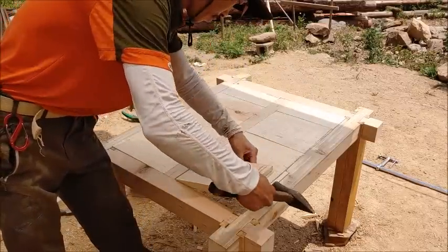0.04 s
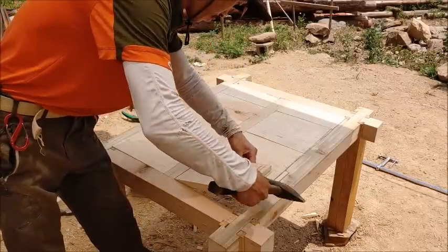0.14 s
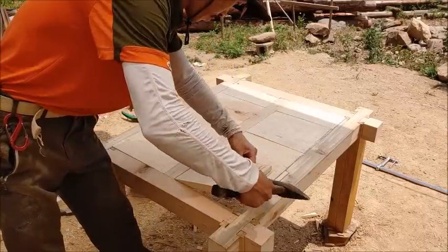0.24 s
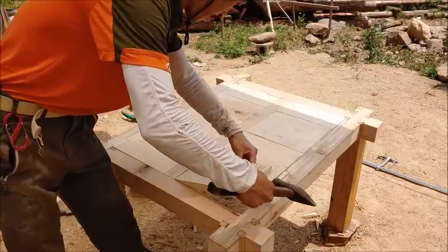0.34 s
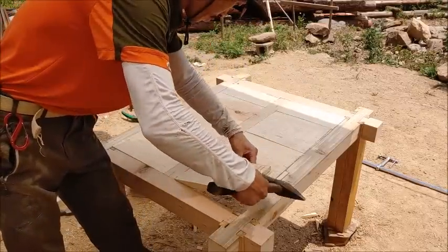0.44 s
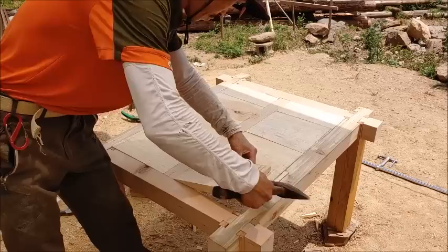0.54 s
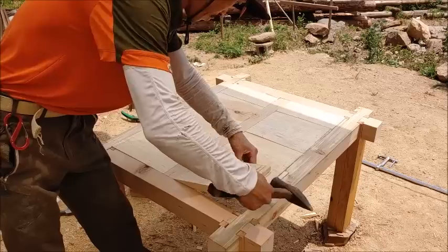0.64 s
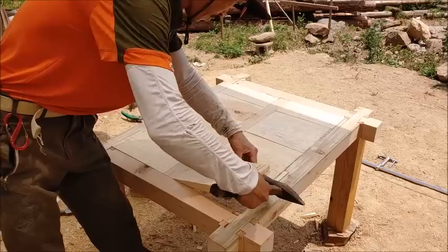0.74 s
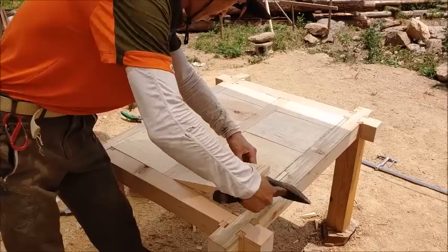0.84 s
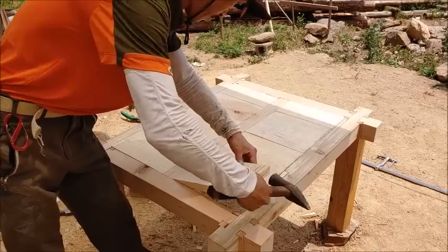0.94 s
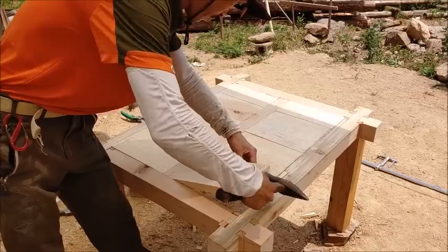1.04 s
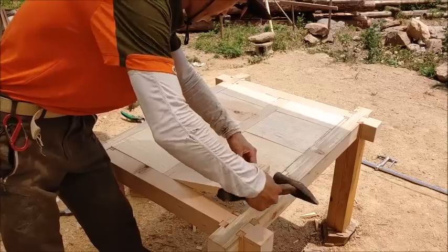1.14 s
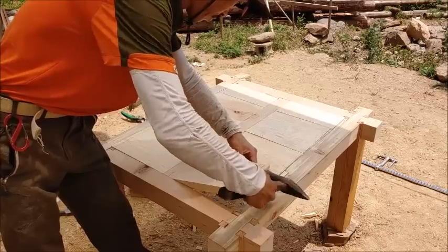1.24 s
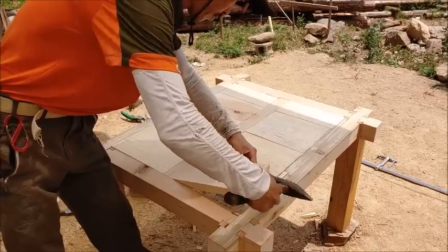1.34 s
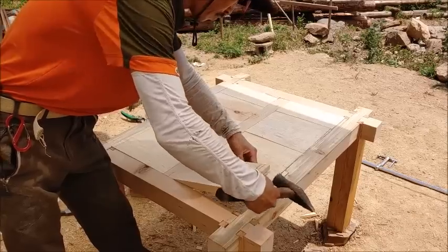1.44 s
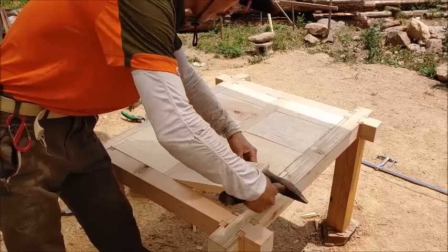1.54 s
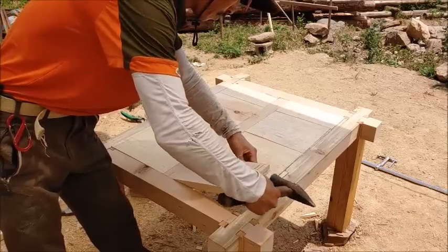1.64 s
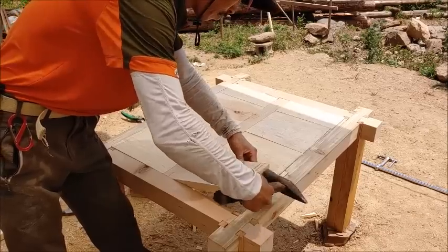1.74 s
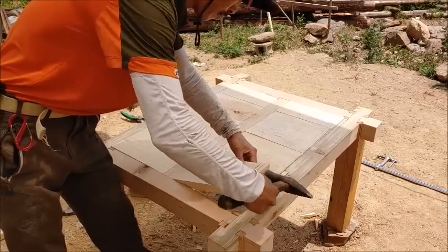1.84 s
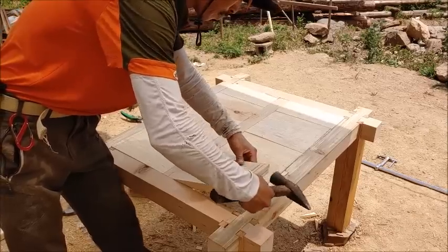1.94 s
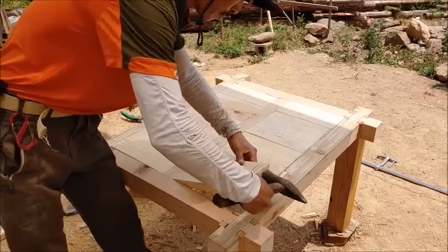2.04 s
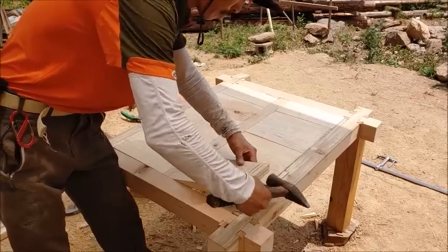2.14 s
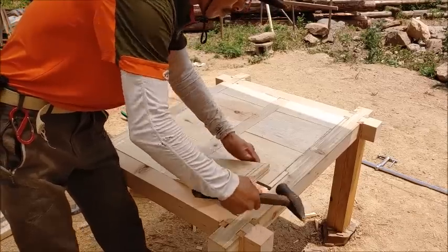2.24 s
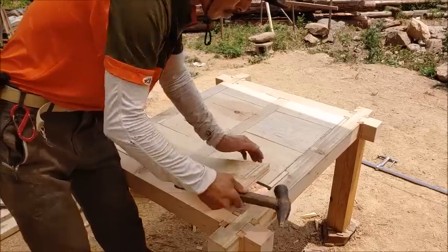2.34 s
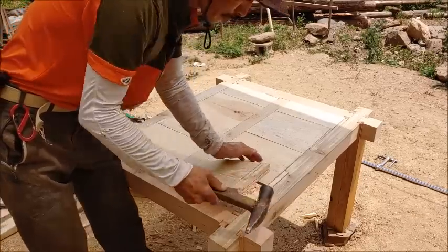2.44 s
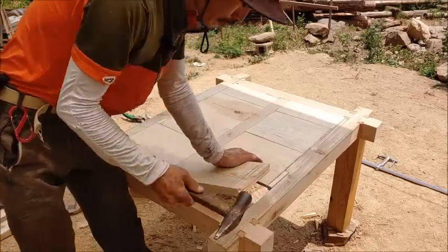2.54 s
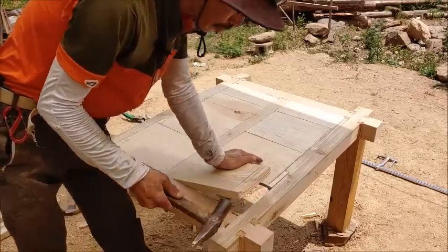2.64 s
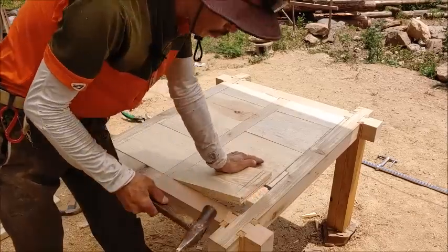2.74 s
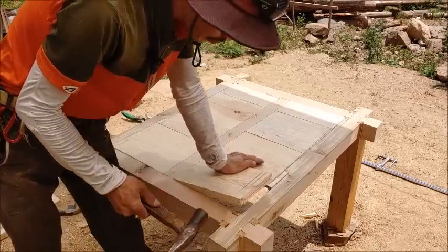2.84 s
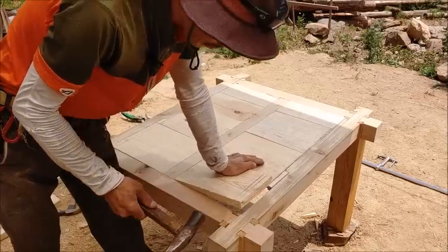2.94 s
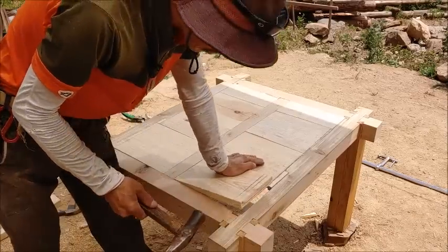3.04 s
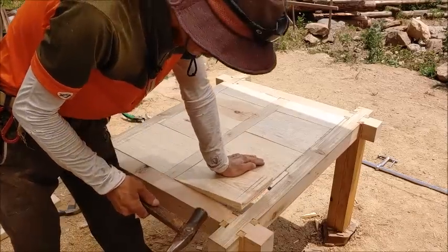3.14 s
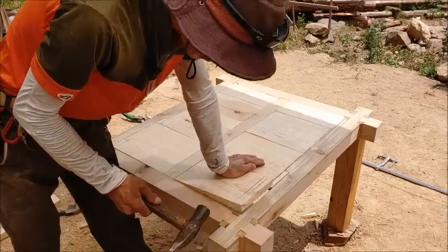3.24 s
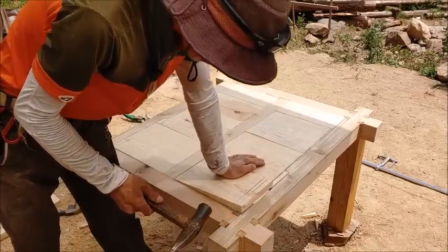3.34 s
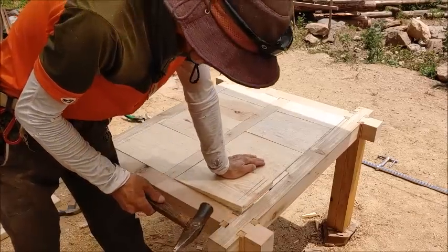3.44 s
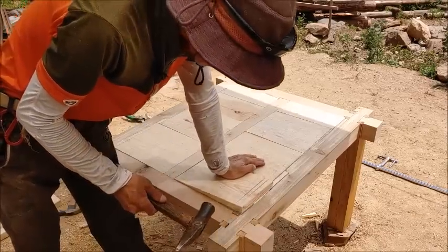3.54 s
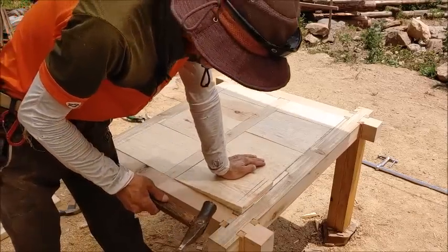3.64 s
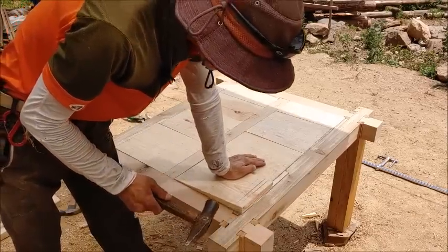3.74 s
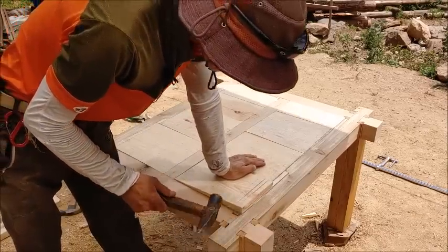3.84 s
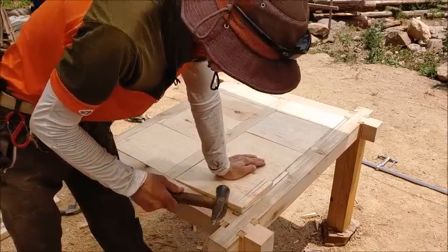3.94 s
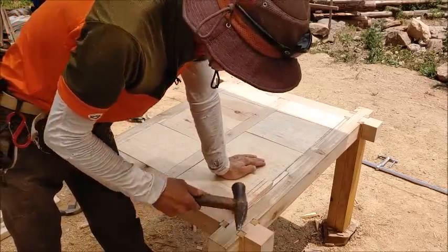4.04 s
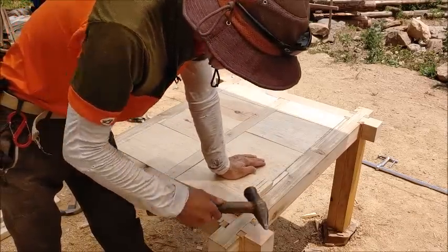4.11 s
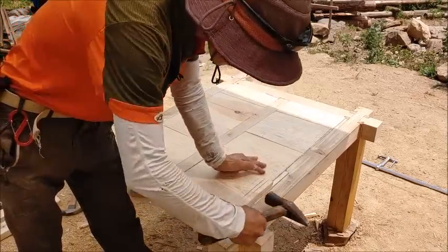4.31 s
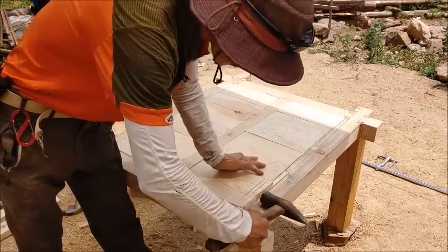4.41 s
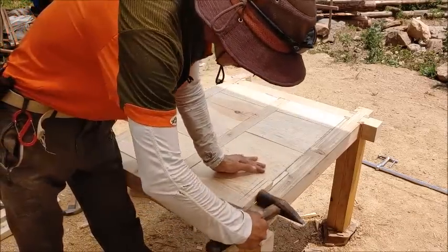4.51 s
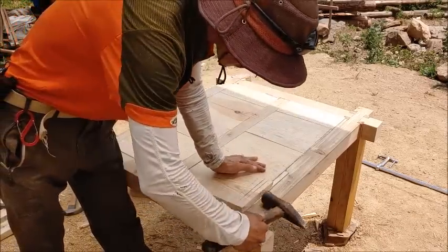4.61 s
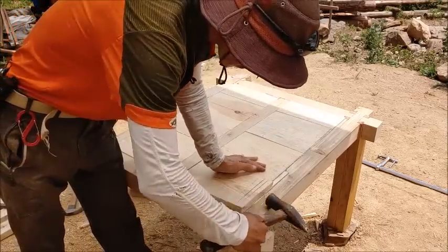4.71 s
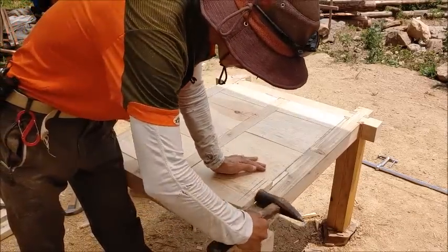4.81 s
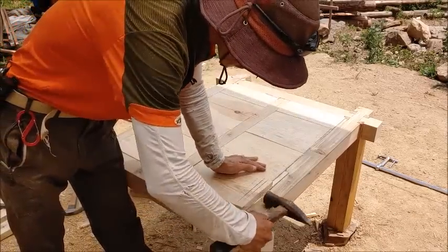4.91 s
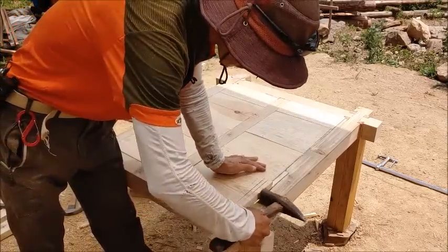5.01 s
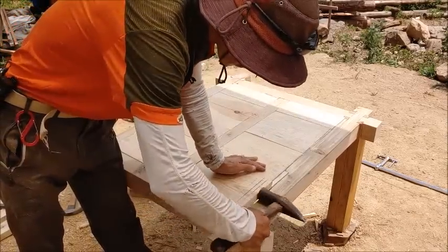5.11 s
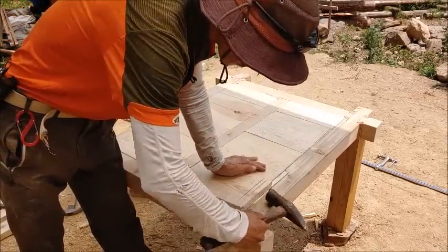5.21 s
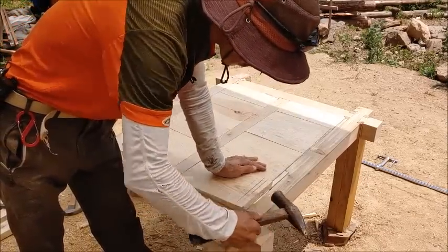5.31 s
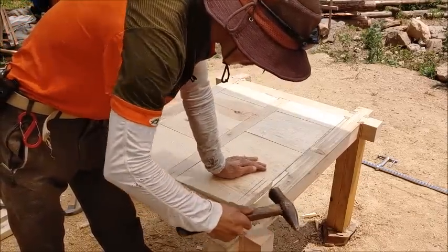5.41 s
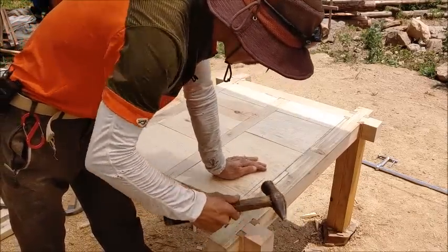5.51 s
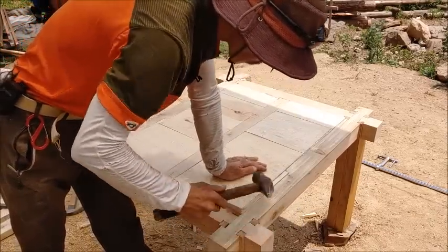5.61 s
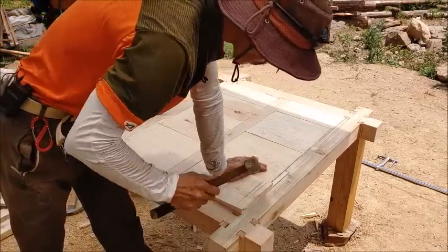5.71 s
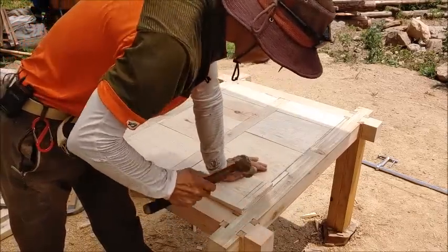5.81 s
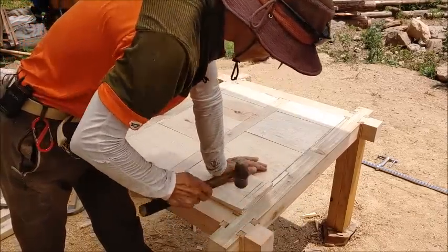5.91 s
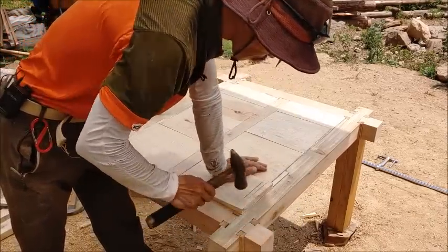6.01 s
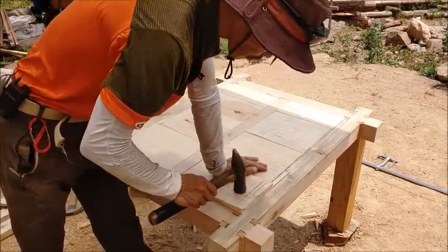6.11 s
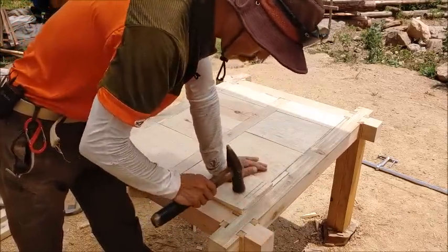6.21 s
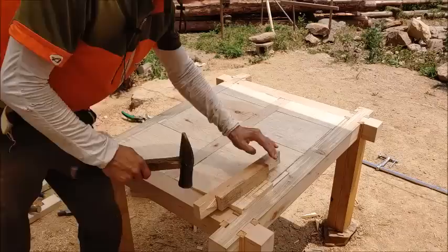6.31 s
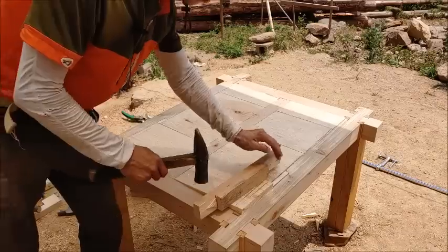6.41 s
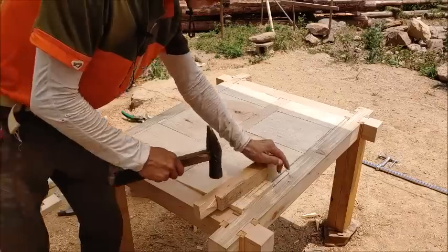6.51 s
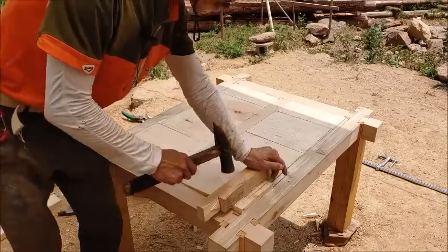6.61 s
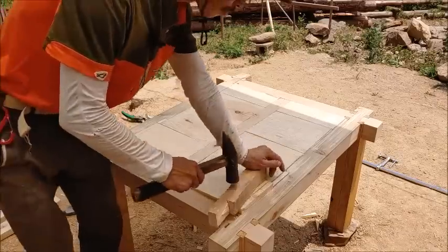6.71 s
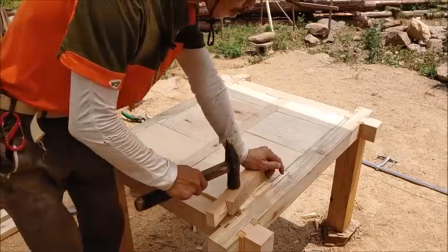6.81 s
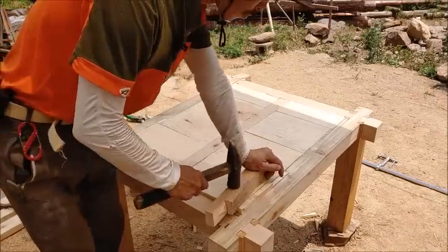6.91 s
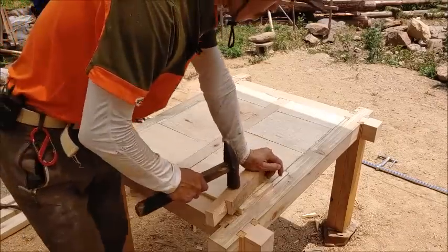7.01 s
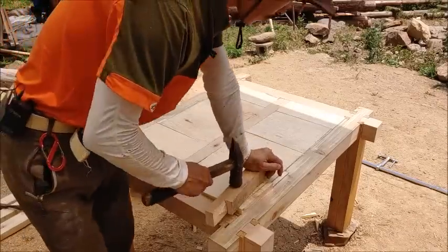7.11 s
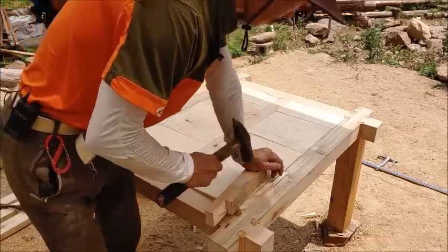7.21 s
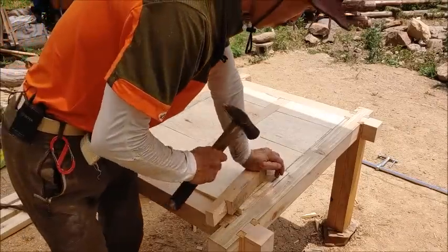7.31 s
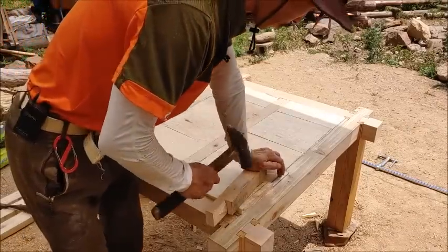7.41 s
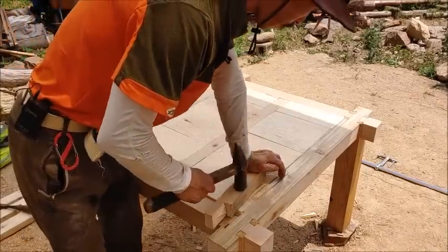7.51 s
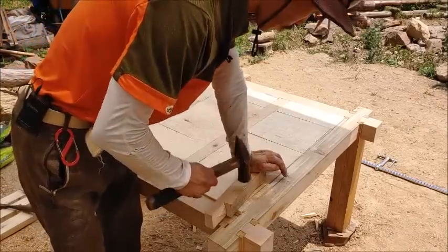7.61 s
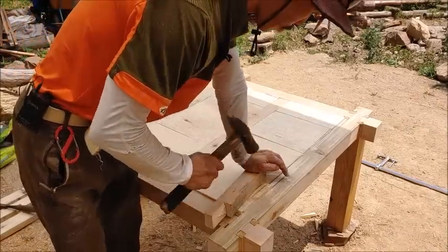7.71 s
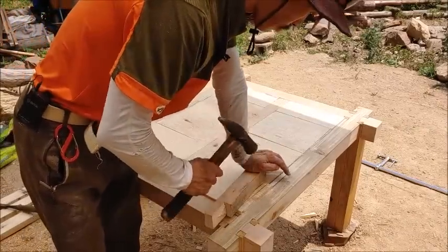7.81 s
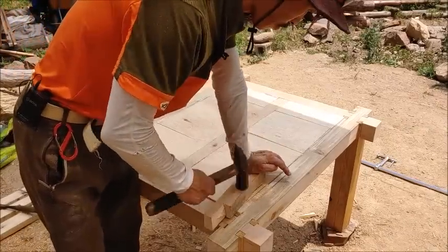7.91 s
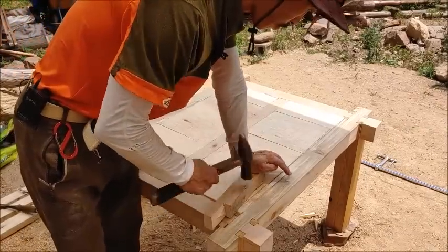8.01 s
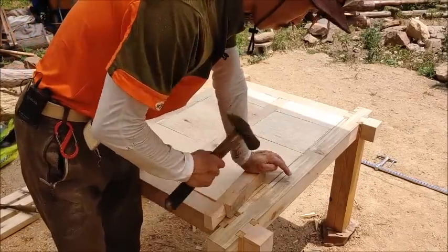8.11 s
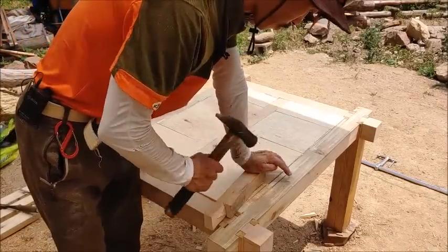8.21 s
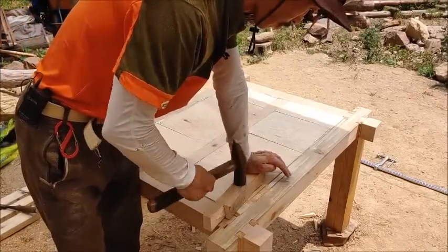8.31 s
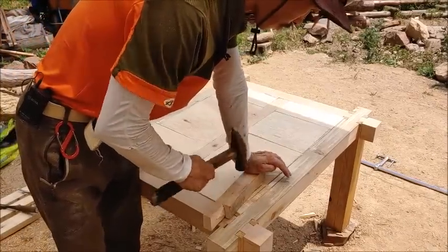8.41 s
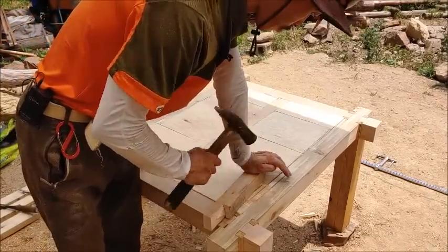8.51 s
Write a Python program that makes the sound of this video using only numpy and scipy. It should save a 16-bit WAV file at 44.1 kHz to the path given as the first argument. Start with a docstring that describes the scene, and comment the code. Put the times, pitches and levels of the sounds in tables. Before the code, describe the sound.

Loud, slightly overloaded wooden hammer blows, dry and close outdoors. The first run changes from open ringing clacks to tighter knocks passing into the frame. Then come quiet dull rubbing, cloth rustle, pressing thumps and a crisp wooden snap. Juddering scrapes lead to duller taps and finally spaced hard cracks on a block. Background hiss sinks after hits and swells back, fuller near the end.

```python
"""Outdoors in a hissing yard, close microphone: a hammer taps a board's edge towards the groove of a timber frame.
The board rubs softly, sleeves rustle, a palm presses and the board snaps home; hard slides follow.
Lighter hammer taps fall on board and block, then, after a brief scuff, hard blows on the block; a rush joins the hiss.
Wood is dying sines and banded noise; rubs, cloth and yard are coloured noise. Loud peaks duck the gain
and overload the microphone, so the hiss sinks and swells back in the pauses."""
import sys
import numpy as np
from scipy import signal
from scipy.fft import rfft, irfft
from scipy.io import wavfile
from scipy.ndimage import uniform_filter1d, minimum_filter1d

SR = 44100
rng = np.random.default_rng(int(sys.argv[2]) if len(sys.argv) > 2 else 0)


def store_wav(level_fs):
    """Save 16-bit WAV to argv[1]."""
    pcm = np.round(np.clip(np.atleast_2d(level_fs), -1, 1) * 32767)
    wavfile.write(sys.argv[1], SR, pcm.T.astype(np.int16))


N = 377055  # samples in the whole scene
SIZE = 16384  # samples in one knock
T, HZ = np.arange(SIZE) / SR, np.fft.rfftfreq(SIZE, 1 / SR)
BREAK_S = 6.379  # ringing stops dead here and the gain starts afresh


def amp(db):
    """Decibels to gain."""
    return 10 ** (np.asarray(db) / 20)


def evened(x):
    """Scales to rms 1."""
    return x / np.sqrt(np.mean(x ** 2) + 1e-20)


def read(points, hz):
    """Level column of a spectrum table, joined on a log-frequency axis."""
    columns = np.transpose(points)
    return np.interp(np.log(hz + 1), np.log(columns[0] + 1), columns[1])


def octaves(hz, knee_hz=1000):
    """Octaves above a soft knee: the span over which brightness acts."""
    return np.log2(np.hypot(1, hz / knee_hz))


def causal(db):
    """Minimum-phase response with the given gain: nothing sounds before the blow."""
    log_gain = np.log(amp(np.concatenate([db, db[-2:0:-1]])))
    return np.exp(np.conj(signal.hilbert(log_gain)))[:len(db)]


def add(mix, s, sound):
    """Adds a sound at time s."""
    part = mix[round(s * SR):][:len(sound)]
    part += sound[:len(part)]


def stream(drive, colour, patchy_db, bright_db=0):
    """Colours a steady drive, in drifting patches; brightness is in dB per octave."""
    hz, _, z = signal.stft(drive, SR, nperseg=512, noverlap=384)
    patches = uniform_filter1d(rng.standard_normal(z.shape), size=8, axis=0)
    patches = evened(uniform_filter1d(patches, size=14, axis=1))
    colour_db = read(colour, hz) + bright_db * octaves(hz)
    z = z * amp(colour_db[:, None] + patchy_db * patches)
    return evened(signal.istft(z, SR, nperseg=512, noverlap=384)[1][:N])


# colour of the yard behind the hiss: f/Hz, level/dB
YARD_COLOUR = [(18, -53), (30, -16), (153, -16), (227, 2.5), (437, -16), (499, -4.5), (913, -12.5),
               (1010, -8.5), (1390, -9.5), (2170, -7.5), (3060, -19), (9460, -21), (16000, -35)]
# colour of the hiss, also of the cloth: f/Hz, level/dB
HISS_COLOUR = [(18, -50), (30, -22), (63, -7), (165, -1), (374, -2.5), (499, 4), (584, -1.5), (1320, -7.5),
               (1540, -13.5), (4530, -10.5), (9710, -19.5), (14000, -31), (16000, -43.5)]
# colour of the late rush: f/Hz, level/dB
RUSH_COLOUR = [(60, -25), (500, 0.5), (1400, 2), (2500, -10), (4000, -14), (12000, -53)]
YARD_DB, HISS_DB, RUSH_DB = -57, -51.5, -45.5
RUSH_S = 7.6  # the rush enters all at once


def background():
    """The quiet yard, its hiss and the late rush: three coloured noises that flicker in patches."""
    yard = amp(YARD_DB) * stream(rng.standard_normal(N), YARD_COLOUR, patchy_db=3.0)
    hiss = amp(HISS_DB) * stream(rng.standard_normal(N), HISS_COLOUR, patchy_db=2.3)
    rush = amp(RUSH_DB) * stream(rng.standard_normal(N), RUSH_COLOUR, patchy_db=2.5)
    return yard + hiss + rush * (np.arange(N) / SR > RUSH_S)


# colour of the first push of a blow: f/Hz, level/dB
PUSH_COLOUR = [(30, -17), (80, -4), (200, 21), (450, 26.5), (1000, 23.5), (2000, 14), (3000, 2), (5000, 8),
               (10000, -0.5), (14000, -17)]


def push(travel_s=0.000745, travel_hz=1000):
    """The blow as a bending wave: its treble runs ahead of its bass."""
    lag = 4 * np.pi * travel_s * np.sqrt(travel_hz * HZ)  # radians; travel_s is the delay at travel_hz
    return irfft(causal(read(PUSH_COLOUR, HZ)) * np.exp(-1j * lag))


def ring(modes, detune=0.0072, spot_db=2.5):
    """Dying sines of alternating sign; each blow lands on another spot, which detunes and favours some."""
    luck = rng.standard_normal((len(modes), 2))
    out = np.zeros(SIZE)
    for k, (hz, db, t60) in enumerate(modes):
        fade = amp(db + spot_db * luck[k, 0] - 60 * T / t60)
        tuned_hz = hz * (1 + detune * luck[k, 1])
        out += (-1) ** k * fade * np.sin(2 * np.pi * tuned_hz * T)
    return out


def rattle(bands, grain, crack_db, crack_t60, crack_hz=1500, rise_s=0.00059, uneven_db=3):
    """Dense wood modes die band by band after a short treble crack; loose joints make the decay uneven."""
    wobble = evened(uniform_filter1d(rng.standard_normal(SIZE), size=220))
    chatter = amp(uneven_db * wobble * np.minimum(T / 0.021, 1))
    spectrum = rfft(grain * chatter) * amp(read(bands, HZ))
    centres = np.transpose(bands)[0]
    out = np.zeros(SIZE)
    for hz, _, t60 in bands:
        share = np.interp(np.log(HZ + 1), np.log(centres), centres == hz)
        crack = amp(crack_db - 60 * T / crack_t60) * hz / (hz + crack_hz)
        fade = amp(-60 * T / t60) + crack
        out += irfft(spectrum * share) * fade / np.linalg.norm(fade)
    return out * (1 - np.exp(-T / rise_s))


def clack(hz, db, t60, linger_db, linger_ratio=5, longest_t60=.2):
    """The struck spot rings briefly and a faint part lingers; so small a spot radiates only near its pitch."""
    linger_t60 = min(t60 * linger_ratio, longest_t60)
    sound = ring([(hz, db, t60)]) + ring([(hz, db + linger_db, linger_t60)])
    return signal.lfilter(*signal.butter(1, [hz / 2, hz * 2], "bandpass", fs=SR), sound)


# modes of the timber frame: f/Hz, level/dB, t60/s
FRAME = [(118, -27.5, 0.14), (182, -30.5, .15), (237, -33, 0.14), (265.7, -12.5, 0.15), (349, -13, 0.058),
         (400, -25, 0.035), (492, -25, 0.22), (740, -35, 0.077), (975, -27.5, .09)]
# at full grip: damping of the struck piece, gain of the frame, change in the rattle of the joints
GRIP_DAMPS_DB, GRIP_PASSES_DB, GRIP_RATTLES_DB = 15, 22, -2
# a clack that rings ten times longer than the short one is this much weaker
CLACK_TRADE_DB, SHORT_CLACK_S = 19, 0.0078


def knocks(rows, modes, bands, piece_db, frame_db, rattle_db, clack_db, likeness, crack_db, crack_t60,
           linger_db, frame_lag_s=0.0073):
    """Each knock pushes, clacks and rings the piece; the tighter the grip, the more the frame rings instead."""
    out, own_grain = np.zeros(N), rng.standard_normal(SIZE)
    fade_out = np.minimum(2 * (1 - T / T[-1]), 1) ** 2
    for s, force_db, bright, grip, clack_hz, clack_t60 in rows:
        # likeness: how far the knocks share one noise grain
        grain = likeness * own_grain + np.sqrt(1 - likeness ** 2) * rng.standard_normal(SIZE)
        wood = push() + amp(piece_db - GRIP_DAMPS_DB * grip) * ring(modes)
        wood += amp(rattle_db + GRIP_RATTLES_DB * grip) * rattle(bands, grain, crack_db, crack_t60)
        wood += amp(frame_db + GRIP_PASSES_DB * grip) * ring(FRAME) * (1 - np.exp(-T / frame_lag_s))
        # a harder, shorter contact gives more treble
        contact = irfft(causal(bright * octaves(HZ)))[:SIZE // 2]
        spot_db = clack_db - CLACK_TRADE_DB * np.log10(clack_t60 / SHORT_CLACK_S)
        sound = signal.fftconvolve(wood, contact)[:SIZE] + clack(clack_hz, spot_db, clack_t60, linger_db)
        # what still rings at the break stops there
        unbroken = (s > BREAK_S) | (s + T < BREAK_S)
        add(out, s, -amp(force_db) * sound * fade_out * unbroken)
    return out


def rocking(taps, delay_s=0.042, sway_hz=115, sway_db=-43, swell_s=.02):
    """Pushed sideways, the frame rocks back on its legs: a soft low shudder of swelling, dying noise."""
    out = np.zeros(N)
    swell = T / swell_s * np.exp(1 - T / swell_s)
    legs = signal.butter(2, [sway_hz * .75, sway_hz * 1.3], "bandpass", fs=SR, output="sos")
    for s, push_db, *_ in taps:
        shudder = evened(signal.sosfilt(legs, rng.standard_normal(SIZE)))
        add(out, s + delay_s, amp(push_db + sway_db) * swell * shudder)
    return out


# modes of the board: f/Hz, level/dB, t60/s
BOARD = [(431, -28, 0.14), (528, -21, 0.038), (620.2, -22.5, 0.12), (658, -27, 0.11), (860, -22.5, 0.042),
         (1011, -11, 0.033), (1268, -29, 0.061), (1561, -26.5, 0.032), (1860, -25, 0.052),
         (2212, -13.5, .025), (4230, -30, 0.069), (4930, -26.5, 0.011), (7750, -30.5, 0.015)]
# dense, quickly dying modes of the loose board: f/Hz, level/dB, t60/s
BOARD_RATTLE = [(30, -13, 0.24), (84.6, 8, 0.26), (210, 18.5, 0.13), (560, 26, 0.14), (1160, 20.5, 0.11),
                (2270, 16.5, 0.12), (3000, 7.5, 0.072), (4240, 12, 0.088), (6950, 2, 0.049),
                (10230, -1.5, 0.067), (12300, -22.5, .05), (16000, -28, .04)]
# hammer on the board's edge: t/s, force level/dB, brightness/dB per octave, grip/0-1, clack f/Hz, clack t60/s
EDGE_TAPS = [ (.2902, 9.5, -0.5, 0, 624, .09), (.6127, 7.5, 1, 0.0025, 1980, .043),
             (.8856, 9, -1, 0, 1995, .03), (.964, -20.5, 2, 0, 2050, .04),
             (1.1545, 9.5, -1, 0.48, 2090, .04), (1.4172, 9.5, 3, 0.62, 883, .009),
             (1.6742, 11, -1, 0.84, 943, .0084), (1.9134, 12, -1.5, .65, 944, .0075),
             (2.1510, 11, -.5, 0.85, 950, .011)]


def edge_taps():
    """The hammer drives the board sideways: it clacks and rings, and the frame rocks after each tap."""
    return rocking(EDGE_TAPS) + knocks(
        EDGE_TAPS, BOARD, BOARD_RATTLE, piece_db=4.5, frame_db=-17.5, rattle_db=4.5, clack_db=6.5,
        likeness=0.97, crack_db=24.0, crack_t60=0.024, linger_db=-26.5)


# board snapping into its groove: t/s, force level/dB, brightness/dB per octave, grip/0-1, clack f/Hz, clack t60/s
SNAPS = [ (2.598, -40, 4.5, 0.27, 514, 0.023), (4.927, -5.5, -2.5, 0.76, 400, .06),
         (4.9381, -0.5, 3.5, 0.44, 4200, 0.0074), (5.1917, 7.5, 0.5, 0.03, 2557, 0.014)]


def snaps():
    """The board knocks into its groove, ringing with a short treble crack."""
    return knocks(SNAPS, BOARD, BOARD_RATTLE, piece_db=7.5, frame_db=-7, rattle_db=11.5, clack_db=10.0,
                  likeness=0.64, crack_db=25, crack_t60=0.014, linger_db=-36)


def strokes(rows, lateness, sharpness):
    """Each stroke speeds up and slows down in one arch; lateness over 1 moves its top towards the end."""
    out = np.zeros(N)
    for s, length, db in rows:
        progress = np.linspace(0, 1, round(length * SR))
        arch = abs(np.sin(np.pi * progress ** lateness)) ** sharpness
        add(out, s, amp(db) * evened(arch))
    return out


def scrape(effort, colour, ring_db, judder_db, patchy_db):
    """Countless tiny slips of wood on wood come in clumps, and also ring the board."""
    clumps = evened(uniform_filter1d(rng.standard_normal(N), size=300))
    slips = rng.standard_normal(N) * amp(judder_db * clumps)
    ringing = evened(signal.fftconvolve(slips, ring(BOARD))[:N])
    return effort * stream(evened(slips) + amp(ring_db) * ringing, colour, patchy_db)


# soft rubs of wood on wood: t/s, length/s, level/dB
RUBS = [(2.6, .05, -39.5), (2.79, 0.14, -41.5), (3.01, 0.15, -42.5), (3.22, 0.125, -45), (3.34, 0.2, -43),
        (3.63, 0.11, -51.5), (3.76, 0.054, -51), (3.86, 0.057, -46.5), (6.72, .16, -52.5)]
# their colour: f/Hz, level/dB
RUB_COLOUR = [(40, -19), (150, -8), (300, -1.5), (520, 2.5), (800, 0), (1150, -6.5), (1450, -17.5),
              (3000, -18.5), (9000, -26.5), (15000, -56.5)]


def rubs():
    """Soft, dull rubs whose slips barely judder and hardly ring the board."""
    effort = strokes(RUBS, lateness=1.09, sharpness=0.35)
    return scrape(effort, RUB_COLOUR, ring_db=-19.5, judder_db=1.0, patchy_db=1.5)


# sleeves rustling as the arms move: t/s, length/s, level/dB
SLEEVES = [(2.7, 0.36, -54), (4.33, 0.66, -50), (5.8, 0.36, -50.5)]


def sleeves():
    """Cloth brushes on cloth with a bright hiss."""
    effort = strokes(SLEEVES, lateness=0.4, sharpness=0.23)
    return effort * stream(rng.standard_normal(N), HISS_COLOUR, patchy_db=4.0, bright_db=1.5)


# palm pressing the board down: t/s, force level/dB, brightness/dB per octave
PALM_THUMPS = [(4.6145, -14.5, -18.5), (4.896, -14, -9), (5.174, -9, -5), (5.973, -30.5, -7)]
PALM_SPOT = (0.86, 155, .14)  # grip/0-1, clack f/Hz, clack t60/s


def palm_thumps():
    """A soft palm holds the board tightly, so the thumps are dull and pass into the frame."""
    rows = [(*row, *PALM_SPOT) for row in PALM_THUMPS]
    return knocks(rows, BOARD, BOARD_RATTLE, piece_db=6.5, frame_db=-3.0, rattle_db=12.5, clack_db=21,
                  likeness=0.54, crack_db=5.5, crack_t60=0.018, linger_db=-41)


# hard slides, and a brief scuff just before the first hard blow: t/s, length/s, level/dB
SLIDES = [(5.65, .14, -37.5), (5.775, 0.087, -26), (7.545, 0.04, -27.5)]
# their colour: f/Hz, level/dB
SLIDE_COLOUR = [(40, -24), (150, 4.5), (520, 4), (800, 7), (1050, -2.5), (1500, -7.5), (2200, 0),
                (3000, -15.5), (4500, -21.5), (9000, -22.5), (15000, -38)]


def slides():
    """Hard slides and a brief scuff: juddering slips ring the board more, strongest late in each stroke."""
    effort = strokes(SLIDES, lateness=1.58, sharpness=0.47)
    return scrape(effort, SLIDE_COLOUR, ring_db=-9, judder_db=2, patchy_db=4.5)


# modes of the block: f/Hz, level/dB, t60/s
BLOCK = [(92, -25.5, .22), (216.3, -8, 0.042), (259, -18, 0.1), (355, -9.5, 0.092), (470, -22.5, 0.23),
         (627, -7.5, 0.033), (688, -15.5, 0.079), (1012, -24, 0.11), (1290, -27, 0.041),
         (1370, -29.5, 0.052), (1935, -11, 0.031), (2360, -29.5, 0.07)]
# dense, quickly dying modes heard with the block: f/Hz, level/dB, t60/s
BLOCK_RATTLE = [(30, 9, 0.22), (85, 14.5, 0.073), (210, 17, 0.15), (560, 26, 0.19), (1390, 21.5, 0.16),
                (2290, 14.5, 0.21), (4200, 8, 0.09), (6960, -10, 0.27), (10000, -12, 0.043),
                (15000, -22, .05)]
# lighter hammer taps: t/s, force level/dB, brightness/dB per octave, grip/0-1, clack f/Hz, clack t60/s
LIGHT_TAPS = [ (6.2945, 6.5, -1.5, 0.47, 400, 0.0091), (6.3675, 4.5, -31, 0.16, 494, 0.019),
              (6.8778, 10.5, -5, 0.24, 249, 0.012), (6.9482, 5.5, -10, 0.85, 400, 0.032),
              (6.980, -6.5, -18, .2, 560, .07), (7.062, -27, -3, 0.29, 750, 0.1)]


def light_taps():
    """Lighter hammer taps on board and block, all voiced by the block's modes: mostly dull, with low clacks."""
    return knocks(LIGHT_TAPS, BLOCK, BLOCK_RATTLE, piece_db=-1.5, frame_db=-19, rattle_db=-1,
                  clack_db=10.5, likeness=0.32, crack_db=31.5, crack_t60=0.025, linger_db=-43.5)


# hammer on the block: t/s, force level/dB, brightness/dB per octave
BLOCK_BLOWS = [(7.577, 10, 2), (8.0095, 9.5, 1), (8.4131, 9, 1.5), (8.4655, -1, -14.5)]
BLOCK_SPOT = (0.42, 452, 0.068)  # grip/0-1, clack f/Hz, clack t60/s


def block_blows():
    """Hard blows ring and rattle the block, and part of each goes through to the frame."""
    rows = [(*row, *BLOCK_SPOT) for row in BLOCK_BLOWS]
    return knocks(rows, BLOCK, BLOCK_RATTLE, piece_db=6.5, frame_db=-10.5, rattle_db=10.5, clack_db=13.5,
                  likeness=0.82, crack_db=27.5, crack_t60=0.018, linger_db=-45)


def scene():
    """The yard, then board and block at work in it, as one channel."""
    board = edge_taps() + snaps() + palm_thumps()
    block = light_taps() + block_blows()
    rubbing = rubs() + slides()
    return (background() + board + rubbing + sleeves() + block)[None]


# peaks over the limit turn the gain down, by the depth at most; it waits, then recovers
LIMIT_DB, DEPTH_DB, HOLD_S, RECOVER_DB_PER_S = -12.5, 12, 0.22, 22


def gain_control(x):
    """A loud peak turns the gain down at once; it is held, then creeps back up."""
    over_db = np.clip(20 * np.log10(abs(x) + 1e-9) - LIMIT_DB, 0, DEPTH_DB)
    recovery, hold = np.arange(len(x)) / SR * RECOVER_DB_PER_S, round(HOLD_S * SR)
    gain_db = recovery - np.maximum.accumulate(over_db + recovery)
    held_db = minimum_filter1d(gain_db, hold, origin=(hold - 1) // 2, mode="nearest")
    # the gain glides over a millisecond, so the first crest partly slips through
    return x * amp(uniform_filter1d(held_db, size=45))


def record(dry, ceiling=0.69, bass_cut_hz=60, treble_cut_hz=14000, edge_hz=16400):
    """The close microphone overloads, its bass cut makes flattened tops sag; treble rolls off to the band limit."""
    # the gain starts afresh at the break
    parts = np.split(dry[0], [round(BREAK_S * SR)])
    ducked = np.concatenate([gain_control(part) for part in parts])[None]
    squashed = ducked / (1 + (ducked / ceiling) ** 4) ** (1 / 4)
    thinned = signal.lfilter(*signal.butter(2, bass_cut_hz, "highpass", fs=SR), squashed)
    softened = signal.lfilter(*signal.butter(3, treble_cut_hz, fs=SR), thinned)
    band_limit = signal.firwin(511, edge_hz, window=("kaiser", 9), fs=SR)
    return signal.oaconvolve(softened, band_limit[None], "same")


dry = scene()
out = record(dry)
store_wav(out)
```